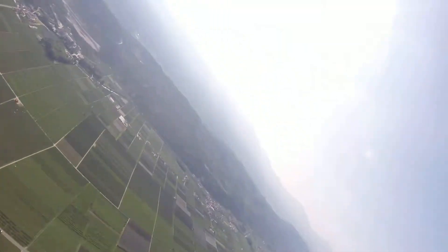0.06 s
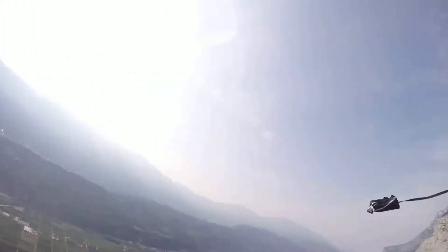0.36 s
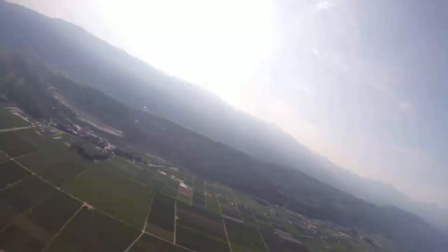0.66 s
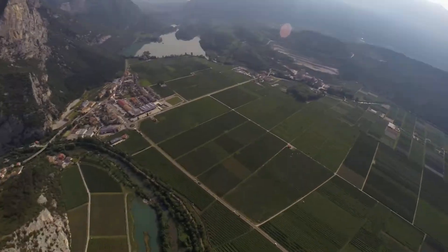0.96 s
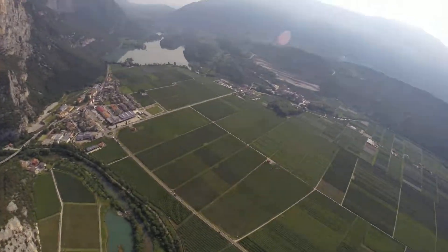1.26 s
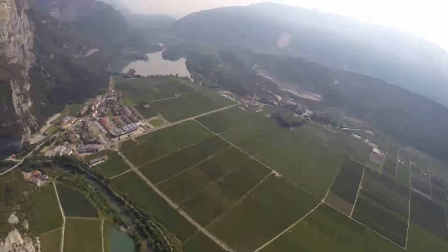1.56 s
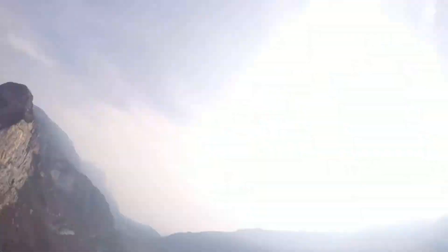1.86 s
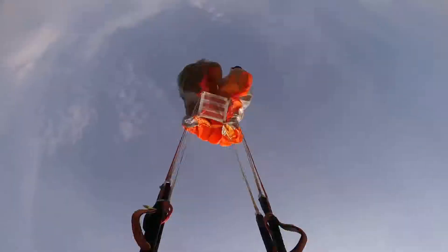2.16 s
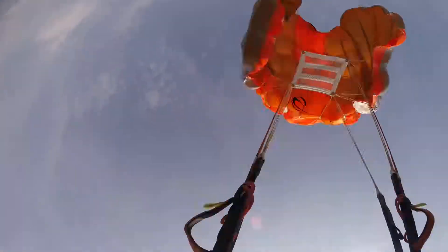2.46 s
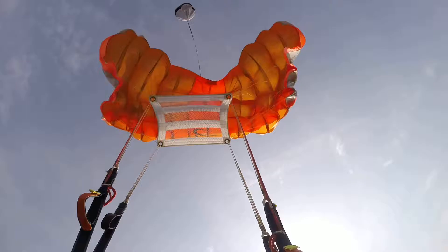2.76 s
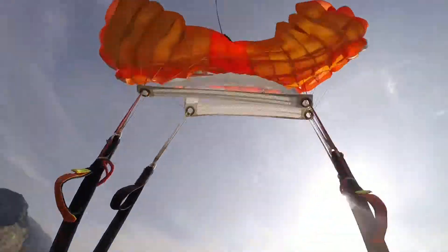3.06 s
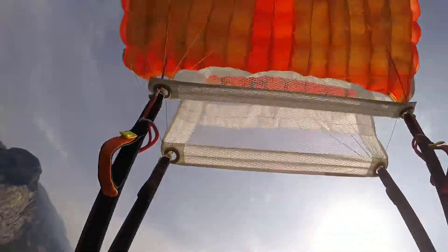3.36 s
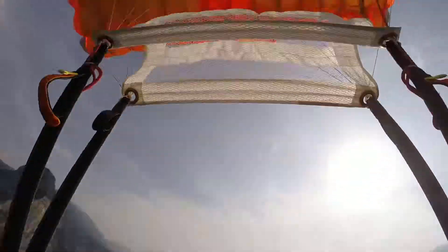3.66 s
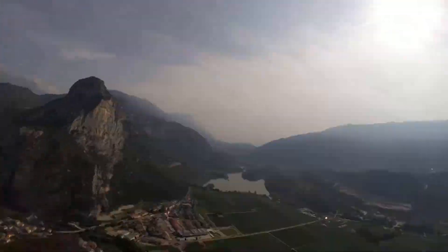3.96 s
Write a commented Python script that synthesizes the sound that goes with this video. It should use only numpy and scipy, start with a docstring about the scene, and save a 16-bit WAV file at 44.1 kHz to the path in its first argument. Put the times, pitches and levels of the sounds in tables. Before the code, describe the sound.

Loud rushing wind buffets the microphone, then drops as a parachute snaps open and flutters.

```python
"""A fast fall, heard from a helmet camera. Air tears past, hisses over an edge and buffets the microphone;
once the body lies flat, a gap in the helmet howls. Big eddies shove the microphone and buckles clack.
The lines pull tight, the parachute cracks open and the harness jolts the mount. Then the wind eases
to the flutter of the canopy, with low flaps of slack cloth and a few sharp snaps of fabric and rigging."""
import sys
import numpy as np
from scipy import signal
from scipy.fft import rfft, irfft
from scipy.io import wavfile
from scipy.ndimage import uniform_filter1d, map_coordinates

SR = 44100
rng = np.random.default_rng(int(sys.argv[2]) if len(sys.argv) > 2 else 0)


def unload_audio(sound):
    """Save the sound as a 16-bit wav file, at the path given as the first command line argument."""
    columns = np.transpose(np.atleast_2d(sound))
    # keep every value between -1 and 1, then stretch to whole-number steps
    steps = np.round(np.clip(columns, -1, 1) * 32767)
    wavfile.write(sys.argv[1], SR, steps.astype(np.int16))


N = 176400
T, HZ = np.arange(N) / SR, np.fft.rfftfreq(N, 1 / SR)

# fader for the rush of the fall: time_s, level_db
RUSH_FADER = [(0, -20.5), (.13, -14.5), (.27, -20), (.55, -22.5), (.7, -21.5), (.85, -20.5), (.95, -23.5),
              (1.2, -20.5), (1.5, -19), (1.58, -24.5), (1.66, -24.5), (1.72, -28), (1.82, -24), (1.84, -48),
              (1.95, -80)]
# its tone: freq_hz, gain_db
RUSH_EQ = [(100, -15), (300, -2.5), (800, -7.5), (1150, 0), (2400, 1.5), (3700, 0), (4150, -9), (4500, -13),
           (5600, -19), (7000, -18.5), (10000, -24.5), (15000, -43)]
# cavities of the camera housing: centre_hz, width_hz, gain_db
HOUSING_CAVITIES = [(3015, 84, 3.5), (3473, 34, 6), (4560, 120, -2.5), (5070, 65, 5), (6000, 71, 11),
                    (6720, 140, -13.5), (7200, 280, 2)]
# hiss over an edge while the body rolls: time_s, level_db
HISS_FADER = [(0, -34), (.15, -23.5), (.3, -21), (.44, -21), (.55, -35), (.65, -19.5), (.79, -15),
              (.875, -17.5), (.895, -30), (1, -72)]
# its tone: freq_hz, gain_db
HISS_EQ = [(1200, -67), (2200, 3), (2900, 9), (3450, 8.5), (3800, 7), (4400, -6.5), (6000, -12.5),
           (7500, -16), (10000, -71), (15000, -62)]
# churning air while the body tumbles: time_s, level_db
CHURN_FADER = [(0, -22.5), (.16, -25.5), (.3, -34.5), (.74, -28.5), (.84, -51)]
# its tone: freq_hz, gain_db
CHURN_EQ = [(250, -14.5), (650, 0), (2200, -5), (4500, -15), (15000, -70)]
# buffeting of the microphone, before trim: time_s, level_db
BUFFET_FADER = [(0, -30), (.2, -21), (.5, -27), (.56, -14), (.75, -22.5), (.87, -27.5), (1.5, -24),
                (1.56, -17), (1.7, -27), (1.84, -15), (1.9, -19.5), (2, -11), (2.06, -21), (2.19, -26.5),
                (2.25, -10), (2.32, -20.5), (2.5, -25.5), (2.58, -15), (2.68, -23), (2.95, -26),
                (3.22, -29), (3.3, -22.5), (3.48, -21.5), (3.54, -29.5), (3.8, -31), (3.9, -24.5),
                (4, -30.5)]
# its tone: freq_hz, gain_db
BUFFET_EQ = [(8, -9), (25, -5.5), (45, -3), (60, -8), (80, 1.5), (95, -4.5), (115, -18), (160, -25),
             (1000, -94)]
# low roar, before trim: time_s, level_db
ROAR_FADER = [(.09, -27), (.3, -38), (.5, -27.5), (.58, -21.5), (.69, -20), (.78, -23), (.85, -36.5),
              (1.55, -33), (1.9, -30.5), (1.97, -24), (2.04, -31), (2.13, -33.5), (2.2, -40), (2.24, -25.5),
              (2.33, -39.5), (2.52, -55), (2.57, -32.5), (2.75, -40.5), (3.05, -50), (3.27, -40.5),
              (3.6, -55), (4, -46.5)]
# its tone: freq_hz, gain_db
ROAR_EQ = [(60, -11), (130, 1), (190, 1), (280, -1), (420, -8), (900, -17), (2000, -23), (6000, -53)]
# howl of the helmet gap: time_s, pitch_hz, level_db
HOWL_PATH = [(.83, 1510, -47), (.89, 1480, -22.5), (.97, 1430, -23), (1.27, 1395, -19.5),
             (1.4, 1369, -23.5), (1.51, 1353, -19), (1.58, 1370, -26.5), (1.79, 1350, -26.5),
             (1.85, 1380, -72)]
# thin hiss of the same gap: freq_hz, gain_db
GAP_HISS_EQ = [(2800, -10), (3500, 4.5), (4150, 10.5), (4600, -40), (8300, -14), (9600, -9.5), (10400, -54)]
# slow shoves of air: start_s, length_s, peak_db
SHOVE_CUES = [(1.528, 0.033, -6.5), (1.577, 0.05, -7.5), (2.23, .022, -4.5), (2.256, .039, -5)]
# clacks of harness buckles and rings: start_s, peak_db, tilt_db_per_octave
CLACK_CUES = [(1.5565, -0.5, -4.5), (1.7599, -9.5, 0.5), (1.823, -10, 3), (2.273, -7, -3), (2.2857, -4, 1)]
# ring of that metal: pitch_hz, level_db
BUCKLE_MODES = [(2400, -0.5), (2800, 0), (3340, 1), (4300, -6.5), (5000, -13), (5480, -8)]
# flutter of canopy and lines, before trim: time_s, level_db
FLUTTER_FADER = [(1.84, -36), (1.93, -37.5), (1.975, -24), (2.04, -37.5), (2.14, -31.5), (2.285, -34.5),
                 (2.31, -45), (2.355, -47.5), (2.39, -35), (2.46, -39), (2.6, -32), (2.69, -35.5),
                 (2.86, -32), (2.89, -27.5), (2.99, -34.5), (3.06, -41), (3.15, -37), (3.195, -31),
                 (3.24, -38.5), (3.39, -34.5), (3.51, -37.5), (3.8, -40.5), (4, -38)]
# its tone: freq_hz, gain_db
FLUTTER_EQ = [(300, -9), (950, -12.5), (1370, 0), (2050, -4), (2380, 1.5), (2620, -1), (3550, -2),
              (4050, -14.5), (4550, -13), (5100, -21.5), (5900, -20.5), (6500, -29), (7400, -25.5),
              (10500, -39), (15000, -60)]
# snaps of fabric and rigging: start_s, peak_db, tilt_db_per_octave
SNAP_CUES = [(1.851, -14.5, 5), (2.937, -15, -3), (3.0083, -12.5, -8.5), (3.053, -21, -2),
             (3.096, -21, -6.5), (3.1582, -13, -2.5), (3.2006, -8.5, 5.5), (3.3153, -18.5, -1),
             (3.932, -22.5, -11)]
# tone of the snaps and the buckles' ticks: freq_hz, gain_db
SNAP_EQ = [(100, -23), (950, -10), (1400, 8), (2000, 1.5), (3050, 12.5), (3500, 4), (4000, -16),
           (4800, -10), (5800, -21), (6500, -27), (7700, -25), (9000, -35), (15000, -57)]
# jolts through the mount: start_s, level_db
JOLT_CUES = [(1.935, -12), (1.987, -10.5), (2.101, -8.5), (2.2918, -12.5), (2.567, -11)]
# bursts of cloth filling with air: start_s, hold_s, level_db
BURST_CUES = [(2.227, 0.013, -19), (2.249, 0.014, -19), (2.271, 0.014, -32)]
# their tone: freq_hz, gain_db
BURST_EQ = [(120, -6), (200, 5), (420, -0.5), (720, -7), (1400, -5), (3300, -7.5), (4400, -21), (9500, -33),
            (15000, -52)]
# low flaps of slack cloth: start_s, length_s, level_db, pitch_hz
FLAP_CUES = [(2.468, 0.036, -21.5, 162), (2.54, 0.035, -23.5, 182), (3.84, 0.11, -34, 172)]

WAVER_RATE_HZ = 22.21  # how fast the flow bends the resonances


def amp(db):
    """Decibels to gain."""
    return 10 ** (np.asarray(db) / 20)


def unit(x):
    """Scales to rms 1."""
    return x / np.sqrt(np.mean(x ** 2) + 1e-20)


def curve(table, column=1):
    """One column of a time table, at every sample."""
    rows = np.array(table)
    return np.interp(T, rows[:, 0], rows[:, column])


def eq(points, hz=HZ):
    """An EQ curve in dB, drawn on a log-frequency axis."""
    freq_hz, db = np.transpose(points)
    return np.interp(np.log(hz + 1), np.log(freq_hz), db)


def shaped(x, db):
    """Filters by an EQ curve, to rms 1."""
    return unit(irfft(rfft(x) * amp(db), N))


def treble_shelf(x, corner_hz, db):
    """Rides everything above a corner with a moving gain."""
    return x + (amp(db) - 1) * irfft(rfft(x) / (1 + (corner_hz / (HZ + 1)) ** 4), N)


def wobble(rate_hz):
    """Random motion up to a rate, rms 1."""
    return unit(irfft(rfft(rng.standard_normal(N)) / (1 + (HZ / rate_hz) ** 2) ** 2, N))


def eddies(rate_hz, depth_db):
    """Noise whose strength jumps with each passing eddy."""
    return rng.standard_normal(N) * amp(depth_db * wobble(rate_hz))


def steadied(x, span_s):
    """Compresses the slow swells of a low noise."""
    power = np.abs(uniform_filter1d(x ** 2, int(span_s * SR)))
    return x / np.sqrt(power + 0.4)


def add(mix, start_s, sound):
    """Drops a sound in at its cue."""
    part = mix[max(round(start_s * SR), 0):][:len(sound)]
    part += sound[:len(part)]


def housing():
    """Peaks and dips of the housing's cavities, in dB."""
    return sum(db * np.exp(-.5 * ((HZ - hz) / width) ** 2) for hz, width, db in HOUSING_CAVITIES)


def wavering(x, depth=0.011):
    """The changing flow bends the resonances of a noise a little up and down."""
    playhead = np.cumsum(1 + depth * wobble(WAVER_RATE_HZ))
    return map_coordinates(x, [playhead], order=3, mode="wrap")


def rush():
    """Turbulent air through the housing; its top octave fades as the fall slows."""
    air = shaped(eddies(rate_hz=55, depth_db=1.0), eq(RUSH_EQ) + housing())
    return amp(curve(RUSH_FADER)) * treble_shelf(air, 6600, db=np.interp(T, [.6, 1.8], [1.5, -4.5]))


def edge_hiss():
    """A sputtering jet over an edge, coloured by the housing."""
    return amp(curve(HISS_FADER)) * shaped(eddies(rate_hz=22, depth_db=1.5), eq(HISS_EQ) + housing())


def churn():
    """Broad, lumpy air that dies down once the flow settles on the helmet."""
    return amp(curve(CHURN_FADER)) * shaped(eddies(rate_hz=43, depth_db=1.5), eq(CHURN_EQ))


def buffeting(trim_db=-1):
    """Lumps of pressure on the microphone, deeper as the fall slows, and the rough roar above them."""
    lumps = steadied(shaped(rng.standard_normal(N), eq(BUFFET_EQ)), span_s=0.0514)
    lumps = treble_shelf(lumps, 58, db=np.interp(T, [2.8, 3.5], [0, -6]))
    roar = steadied(shaped(eddies(rate_hz=50, depth_db=2.5), eq(ROAR_EQ)), span_s=.05)
    return amp(trim_db) * (unit(lumps) * amp(curve(BUFFET_FADER)) + unit(roar) * amp(curve(ROAR_FADER)))


def howl(half_width_hz=89, wander_hz=16.1):
    """A helmet gap resonates, its pitch wandering and sinking with the flow, under a thin hiss."""
    band_db = -10 * np.log10((1 + (HZ / half_width_hz) ** 2) * (1 + (HZ / 450) ** 4))
    pitch_hz = curve(HOWL_PATH) + wander_hz * wobble(WAVER_RATE_HZ)
    phase = 2 * np.pi * np.cumsum(pitch_hz) / SR
    a, b = (shaped(noise, band_db) for noise in rng.standard_normal((2, N)))
    tone = unit(a * np.cos(phase) + b * np.sin(phase))  # low noise shifted up to the pitch
    hiss = amp(-13.5) * shaped(rng.standard_normal(N), eq(GAP_HISS_EQ))
    return amp(curve(HOWL_PATH, column=2)) * (tone + hiss)


def shoves():
    """A large eddy pushes on the microphone, then sucks."""
    return sum(amp(db) * np.sin(2 * np.pi * np.clip((T - start_s) / length_s, 0, 1))
               for start_s, length_s, db in SHOVE_CUES)


def buckle_clacks(chatter_s=0.0012, t60_s=0.011, tick_db=1):
    """Metal hardware strikes, chatters for a moment and rings briefly, damped by the webbing."""
    out, t = np.zeros(N), T[:SR // 10]
    contact = np.exp(-t / chatter_s)
    for start_s, peak_db, tilt in CLACK_CUES:
        modes = sum(amp(db + tilt * np.log2(hz)) * np.sin(2 * np.pi * (hz * t + rng.random()))
                    for hz, db in BUCKLE_MODES)
        ring = unit(modes) * amp(-60 * t / t60_s)
        tick = contact * shaped(rng.standard_normal(N), eq(SNAP_EQ) + tilt * np.log2(HZ + 1))[:len(t)]
        clack = (ring + amp(tick_db) * tick) * (1 - contact ** 2)
        add(out, start_s, amp(peak_db) * clack / np.abs(clack).max())
    return out


def canopy_flutter(crinkles_per_s=240, crinkle_db=-7.5, trim_db=1):
    """Cloth pulses and crinkles, duller as the speed falls, over a faint, steady bed of air."""
    hits = rng.random(N) < crinkles_per_s / SR
    sizes = amp(2.9 * np.minimum(rng.exponential(1, N), 3))
    crinkles = amp(crinkle_db) * unit(hits * sizes * rng.choice([-1, 1], N))
    cloth = shaped(eddies(rate_hz=29, depth_db=2.5) + crinkles, eq(FLUTTER_EQ))
    cloth = treble_shelf(cloth, 4150, db=np.interp(T, [2.9, 3.6], [1.0, -7.0]))
    fade_in = np.clip((T - 1.8) / 0.039, 0, 1)
    air_bed = amp(-77) * rng.standard_normal(N)
    return cloth * amp(curve(FLUTTER_FADER) + trim_db) * fade_in + air_bed


def snaps(crack_s=0.00075, tail_s=0.0067, tail_db=-12.5):
    """Fabric and rigging snap: a millisecond crack with a short rustling tail."""
    size = 2048
    out, t, hz = np.zeros(N), T[:size], np.fft.rfftfreq(size, 1 / SR)
    for start_s, peak_db, tilt in SNAP_CUES:
        crack = rng.standard_normal(size) * (np.exp(-t / crack_s) + amp(tail_db) * np.exp(-t / tail_s))
        log_gain = np.log(amp(eq(SNAP_EQ, hz) + tilt * np.log2((hz + 300) / 3000)))
        mirrored = np.r_[log_gain, log_gain[-2:0:-1]]
        minimum_phase = np.exp(np.conj(signal.hilbert(mirrored)))[:len(hz)]  # keeps the attack sharp
        snap = irfft(rfft(crack) * minimum_phase)
        add(out, start_s, amp(peak_db) * snap / np.abs(snap).max())
    return out


def mount_jolts(pitch_hz=83.2, t60_s=0.33, attack_s=0.0026):
    """Tugs on the harness make the camera mount ring with a low thud."""
    out, t = np.zeros(N), T[:SR // 2]
    thud = np.sin(2 * np.pi * pitch_hz * t) * np.minimum(t / attack_s, 1) * amp(-60 * t / t60_s)
    for start_s, db in JOLT_CUES:
        add(out, start_s, amp(db) * thud)
    return out


def cloth_bursts(attack_s=0.0013, release_s=0.0061):
    """The cloth fills and rips taut in short bursts of noise."""
    envelope = np.zeros(N)
    for start_s, hold_s, db in BURST_CUES:
        attack = np.clip((T - start_s) / attack_s, 0, 1)
        release = np.exp(-np.maximum(T - start_s - hold_s, 0) / release_s)
        envelope += amp(db) * attack * release
    return envelope * shaped(rng.standard_normal(N), eq(BURST_EQ))


def slack_flaps(sag=0.2, roughness=0.38):
    """Slack cloth beats in a short, rough flutter that slows."""
    out = np.zeros(N)
    for start_s, length_s, db, hz in FLAP_CUES:
        progress = np.clip((T - start_s) / length_s, 0, 1)
        beat = np.sin(2 * np.pi * hz * length_s * (progress - sag * (progress - .5) ** 2))
        grit = roughness * shaped(rng.standard_normal(N), eq(ROAR_EQ))
        out += amp(db) * np.sin(np.pi * progress) * (beat + grit)
    return out


def scene():
    """All the air, cloth and hardware at one microphone."""
    wind = wavering(rush() + edge_hiss()) + churn() + howl() + buffeting() + shoves()
    cloth = canopy_flutter() + snaps() + cloth_bursts() + slack_flaps()
    hardware = buckle_clacks() + mount_jolts()
    return (wind + cloth + hardware)[None]


def record(dry):
    """Soft overload rounds the peaks, then a steep low-pass takes off the very top."""
    clipped = dry / (1 + dry ** 8) ** (1 / 8)
    lowpass = signal.firwin(511, cutoff=15250, window=("kaiser", 9), fs=SR)
    return signal.oaconvolve(clipped, lowpass[None], "same")


dry = scene()
out = record(dry)
unload_audio(out)
```